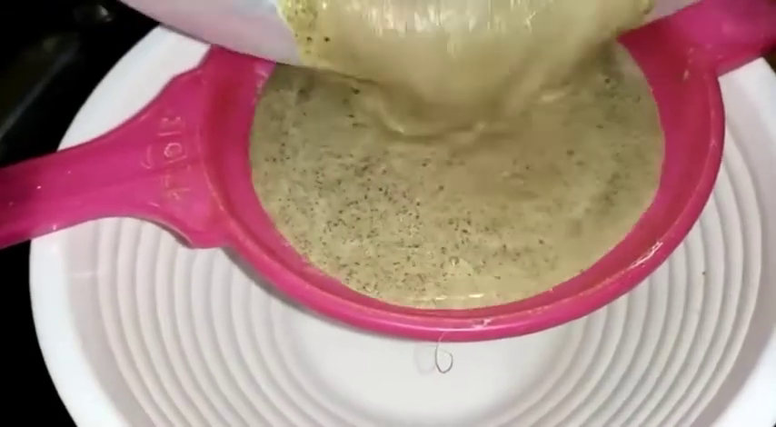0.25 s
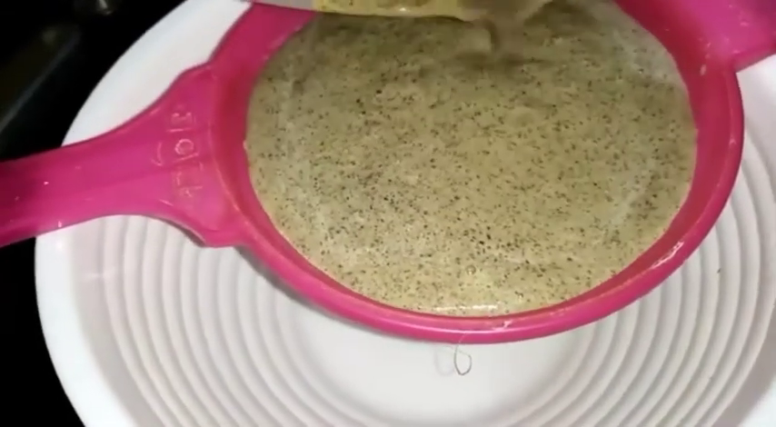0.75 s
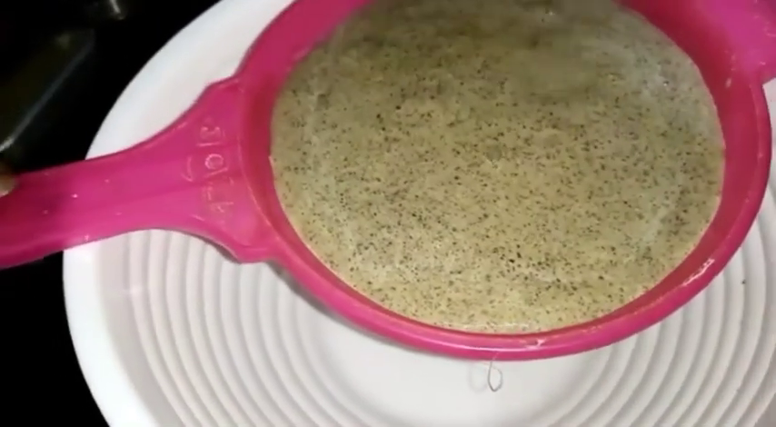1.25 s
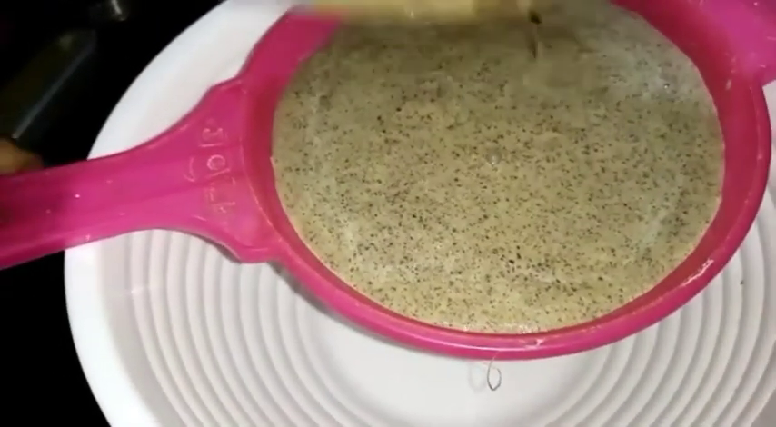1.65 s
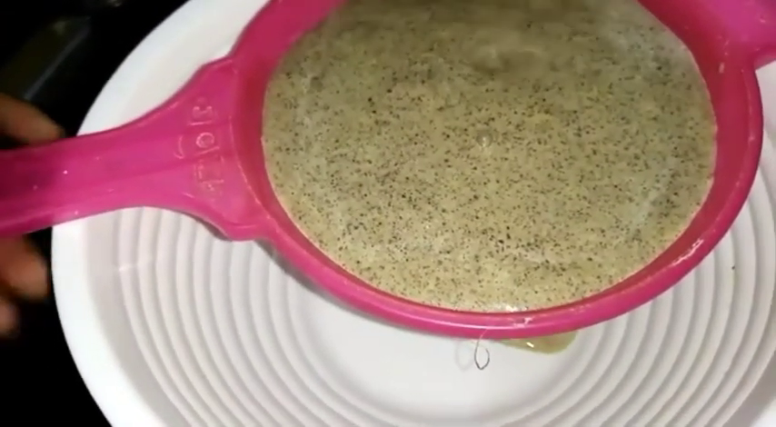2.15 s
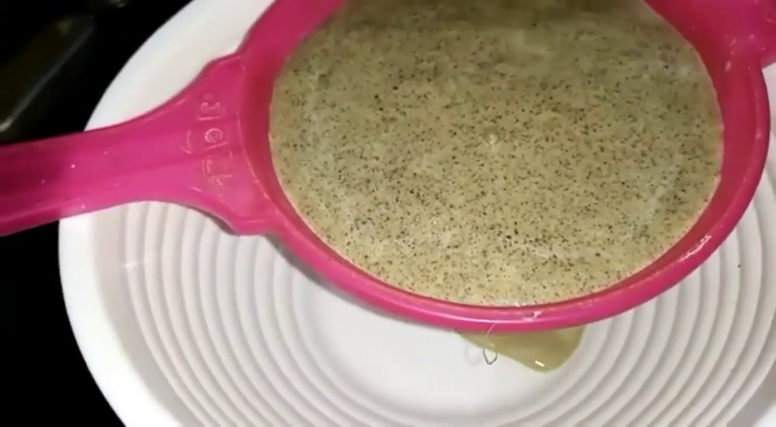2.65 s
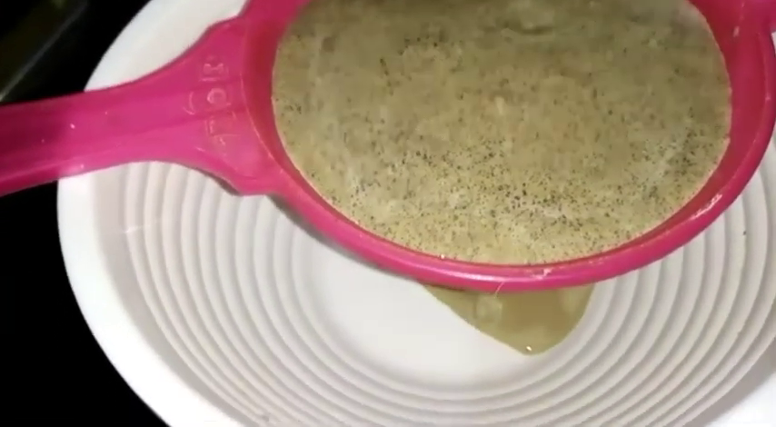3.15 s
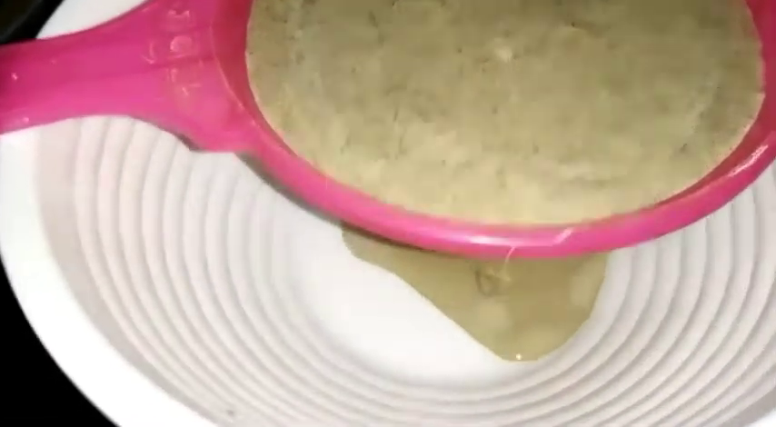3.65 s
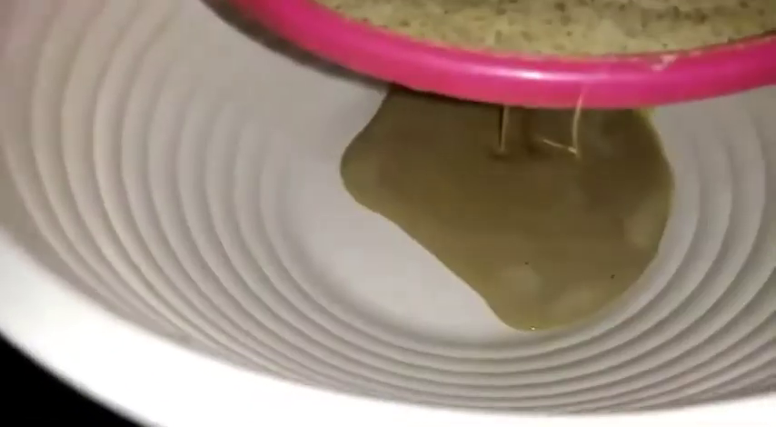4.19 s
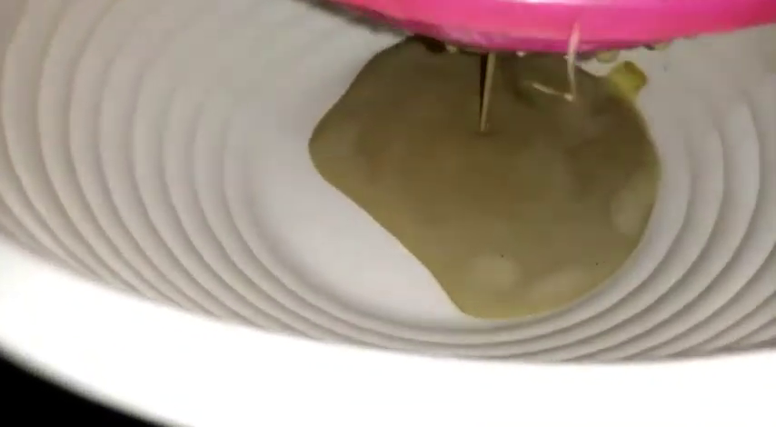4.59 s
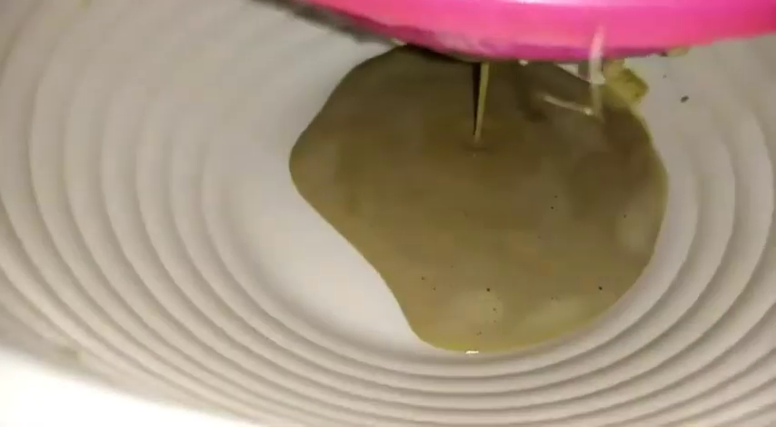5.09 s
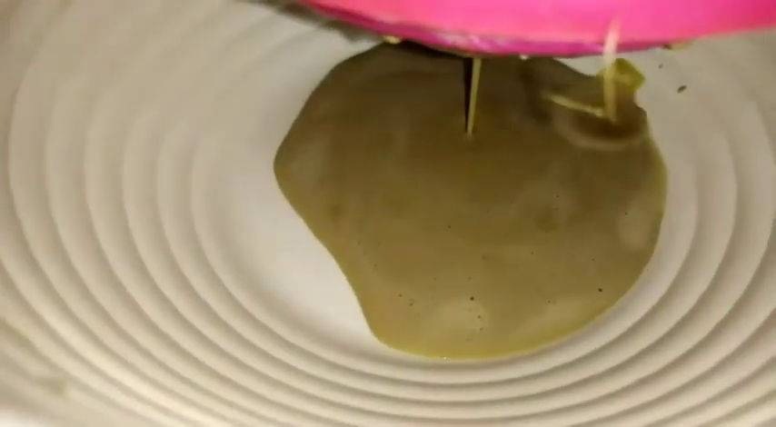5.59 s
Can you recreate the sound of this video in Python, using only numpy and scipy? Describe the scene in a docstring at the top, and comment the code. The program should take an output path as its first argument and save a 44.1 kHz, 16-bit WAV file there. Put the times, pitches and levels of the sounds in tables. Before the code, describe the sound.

A hard-walled kitchen with steady low mains hum near 100 Hz, soft hiss, patchy room noise and faint rustle. From 0.15 to 0.4 s thick liquid drops close by into a plastic strainer: several quick wet splats with hollow ringing glugs around 550 Hz, strongest at 0.25 s, plus a brief wet rush that dies away. Afterwards the liquid is practically silent. A small cage bird further off chatters throughout, mostly heard as reflections: short grainy rasps near 5.5 kHz, hoarse fluttering slurs around 3 kHz and scooping whistles, busiest and loudest at 2.6-2.9 and 3.4-3.8 s, then mainly rasps from 4.5 s. A faint thin fizz passes at about 5.1 s. Hard kitchenware knocks crack and ring at 5.56 s, with weaker taps and a short pot tone near 820 Hz, then another strong knock at 5.82 s. The left channel is nearer, louder and duller; the right thinner.

```python
"""Thick liquid glugs from a pot into a plastic strainer, each lump a splat and a ringing pocket of air,
with a wet noise rush that dies away; then it runs through all but silently.
All along, a small cage bird warbles and chatters further off in the hard-walled room, in fluttering tones
and grainy noise, over mains hum, hiss, room noise and a faint rustle. A thin fizz comes late, then
kitchenware knocks: noise cracks and damped modes. Of two microphone ports the left is nearer, louder, duller."""
import sys
import numpy as np
from scipy import signal
from scipy.fft import rfft, irfft, next_fast_len
from scipy.io import wavfile
from scipy.ndimage import uniform_filter1d, map_coordinates

SR = 44100
rng = np.random.default_rng(int(sys.argv[2]) if len(sys.argv) > 2 else 0)


def unload_wav(signal):
    """Save mono or channel-first audio to the path in sys.argv[1] as 16-bit WAV at rate SR, clipped to [-1, 1]."""
    wavfile.write(
        sys.argv[1],
        SR,
        np.round(np.clip(np.atleast_2d(signal).T, -1, 1) * 32767).astype(np.int16),
    )


N = 257103
RUN_UP_S = .02  # room for the soft start of one of the bird's notes


def amp(db):
    """Decibels to gain."""
    return 10 ** (np.asarray(db) / 20)


def unit(x):
    """Scale to rms 1."""
    return x / np.sqrt(np.mean(x ** 2) + 1e-20)


def along(points, hz):
    """Read (frequency, value) points at hz, on a log frequency axis."""
    f, v = np.transpose(points)
    return np.interp(np.log(hz + 1e-3), np.log(f), v)


def level(curve):
    """(time [s], level [dB]) rows as one gain per sample."""
    return amp(np.interp(np.arange(N) / SR, *np.transpose(curve)))


def wobble(rate, size):
    """A smooth random curve, rate knots a second."""
    knots = rng.standard_normal(int(size * rate / SR) + 4)
    return map_coordinates(knots, [np.arange(size) * rate / SR])


def filtered(x, response):
    """x shaped by a complex response of frequency."""
    size = x.shape[-1]
    m = next_fast_len(size + 8192)
    return irfft(rfft(x, m) * response(np.fft.rfftfreq(m, 1 / SR)), m)[..., :size]


def noise(colour, size, centre=1):
    """Noise of rms 1 with the given colour, its frequencies multiplied by centre."""
    return unit(filtered(rng.standard_normal(size), lambda hz: amp(along(colour, hz / centre))))


def add(track, s, sound):
    """Mix a sound into the track at time s."""
    start = round(s * SR)
    part = sound[..., :max(N - start, 0)]
    track[..., start:start + part.shape[-1]] += part


def ring(modes, t, scatter_db, pitch=1, damping=1):
    """Damped modes, struck at slightly new strengths; neighbouring modes swing opposite ways."""
    total = 0
    for k, (hz, db, t60) in enumerate(modes):
        mode_db = db + scatter_db * rng.standard_normal() - 60 * damping * t / t60
        total = total + (-1) ** k * amp(mode_db) * np.sin(2 * np.pi * hz * pitch * t)
    return total


def in_room(x, direct_db, wet_db):
    """The direct sound plus the walls' answer: decaying noise, different at each port."""
    # decay of the walls' answer: (frequency [Hz], t60 [s])
    wall_t60 = [(200, 0.32), (1000, 0.36), (3000, 0.53), (5000, 0.51), (8000, 0.45), (14000, 0.27)]
    hz, t, z = signal.stft(rng.standard_normal((2, SR // 2)), SR, nperseg=256)
    decay = amp(-60 * t / along(wall_t60, hz)[:, None])
    tail = signal.istft(z * decay, SR, nperseg=256)[1]
    tail *= np.clip(np.arange(tail.shape[1]) / SR / 0.00092, 0, 1)  # fades in over 0.92 ms
    response = amp(wet_db) * tail / np.linalg.norm(tail[0])
    response[:, 0] += amp(direct_db)
    return signal.fftconvolve(x[None], response, axes=1)


def pour():
    """The stream rushes wetly; each lump splats and traps a ringing pocket of air."""
    # lumps falling into the strainer: (time [s], level [dB], splat relative to it [dB])
    glugs = [(.151, -22.5, -8), (0.1904, -27, -16), (0.2024, -41.5, 11.5), (.231, -32, -3),
             (.246, -11, -10), (0.2853, -23, -8.5), (.367, -32.5, -5)]
    # modes of the air pocket under a full lump: (frequency [Hz], level [dB], t60 [s])
    pocket_modes = [(550, 2.5, 0.057), (729, -4.5, 0.058), (883, -21.5, .08), (1145, -27, 0.087),
                    (1490, -22, 0.091)]
    # colour of splat and rush: (frequency [Hz], level [dB])
    splat_colour = [(200, -20), (420, -13.5), (600, -8.5), (1200, -8), (2200, -6.5), (4000, -7.5),
                    (6500, -14), (9000, -19.5), (12000, -51), (15000, -22)]
    # wet rush of the stream: (time [s], level [dB])
    rush_level = [(0, -40.5), (.12, -50), (.28, -41), (.36, -85), (.5, -132), (.9, -84)]
    # a smaller lump traps less air and rings higher and shorter: share of rise per dB below a full lump
    full_lump_db, pitch_rise, damping_rise = -11, .004, .03
    # the small pocket radiates next to nothing below 510 Hz
    pocket_highpass = signal.butter(8, 510, "high", fs=SR, output="sos")

    out, t = np.zeros((2, N)), np.arange(SR // 4) / SR
    for s, db, splat_db in glugs:
        smaller_db = full_lump_db - db
        pitch, damping = 1 + pitch_rise * smaller_db, 1 + damping_rise * smaller_db
        pocket = ring(pocket_modes, t, scatter_db=1, pitch=pitch, damping=damping)
        # the pocket closes just after the splat, so its ring starts softly
        pocket *= (1 - np.exp(-t / 0.0008)) ** 2
        pocket = signal.sosfilt(pocket_highpass, pocket)
        splat = noise(splat_colour, len(t)) * amp(splat_db - 60 * t / 0.018)  # t60 18 ms
        add(out, s, in_room(amp(db) * (pocket + splat), direct_db=0.5, wet_db=-13.5))
    uneven = unit(noise(splat_colour, N) * amp(2.6 * wobble(303, N)))
    add(out, 0, in_room(level(rush_level) * uneven, direct_db=-1, wet_db=-1.5))
    return out * amp([[1], [-2]])  # the pour leans left


def bird():
    """A warble of scooping whistles, hoarse slurs and rasps, heard mostly off the walls."""
    # clear whistles, most scooping up: (time [s], length [s], pitch [Hz], level [dB], share it starts flat)
    whistles = [(1.535, 0.06, 4930, -40, 0.07), (1.836, 0.023, 5300, -42.5, 0),
                (2.145, 0.081, 4990, -40.5, 0.071), (2.208, 0.028, 3605, -46, 0),
                (2.24, 0.07, 2884, -39.5, 0.047), (2.94, 0.043, 4390, -32.5, 0.045),
                (2.942, 0.031, 3950, -39.5, 0.024), (3.186, 0.077, 5087, -40.5, .07),
                (3.346, 0.022, 2780, -39.5, 0.00022), (3.439, .02, 4070, -40.5, 0),
                (3.457, 0.028, 3920, -38, 0.065), (3.475, 0.047, 4650, -34, 0.049),
                (3.49, 0.037, 5180, -31, 0.043), (3.739, 0.014, 2933, -32, 0.012),
                (3.785, 0.085, 4723, -35, 0.013), (3.79, 0.072, 6370, -48.5, 0.025),
                (4.108, 0.024, 3715, -32.5, 0.025), (4.612, 0.021, 7440, -44, 0.063)]
    # hoarse slurs, mostly falling, often two at once:
    # (time [s], length [s], first pitch [Hz], last pitch [Hz], flutter [Hz], level [dB])
    slurs = [(0.422, 0.05, 3200, 3000, 232, -48), (0.652, 0.036, 3180, 3030, 280, -47),
             (0.779, 0.045, 3134, 3310, 400, -40.5), (0.845, .09, 2865, 2570, 203, -46),
             (1.326, 0.0584, 3780, 3620, 180, -45), (1.366, 0.086, 3003, 2630, 284, -44.5),
             (1.465, 0.056, 2440, 2286, 120, -52), (1.794, 0.17, 3547, 3220, 432, -42.5),
             (2.037, 0.056, 3080, 2764, 172, -43.5), (2.218, 0.045, 3530, 3300, 350, -44),
             (2.58, 0.057, 4280, 3744, 135, -30.5), (2.648, 0.047, 3970, 4090, 110, -34.5),
             (2.636, .09, 3207, 2965, 189, -34.5), (2.7, 0.085, 5100, 4710, 280, -42.5),
             (2.707, .1, 1890, 1958, 258, -46), (2.716, 0.074, 3690, 3610, 140, -37.5),
             (2.745, 0.094, 2993, 2845, 99, -35), (2.819, .055, 3780, 3830, 200, -41),
             (3.116, 0.11, 2663, 2356, 154, -48.5), (3.213, 0.099, 3726, 3050, 352, -37.5),
             (3.55, 0.091, 4577, 4320, 284, -35.5), (3.751, 0.15, 3354, 3125, 280, -41),
             (3.744, 0.16, 3950, 4303, 230, -34.5), (4.069, 0.053, 3027, 2966, 150, -39.5),
             (4.16, 0.12, 3310, 2897, 420, -43), (4.171, .04, 2616, 2376, 160, -41),
             (4.267, 0.05, 4600, 4920, 330, -38.5), (4.431, 0.03, 4100, 3990, 346, -42.5),
             (4.763, 0.16, 3300, 3424, 300, -46), (5.172, 0.038, 3597, 3500, 192, -35),
             (5.39, 0.037, 5070, 4910, 258, -40.5)]
    # bursts of rasping chatter: (time [s], length [s], level [dB], centre [Hz])
    rasps = [(0.048, 0.063, -34, 5950), (0.858, 0.049, -32, 5390), (0.986, 0.053, -34.5, 5670),
             (1.133, 0.064, -33, 5640), (1.246, 0.02, -42.5, 5670), (1.351, 0.062, -38.5, 5700),
             (1.609, 0.082, -33, 5950), (1.833, 0.059, -43, 4870), (2.805, 0.058, -30.5, 5670),
             (3.634, 0.072, -37.5, 5600), (4.238, 0.084, -52, 5670), (4.495, 0.112, -46.5, 5470),
             (4.692, 0.068, -39, 5500), (4.77, 0.111, -36, 5730), (4.898, 0.074, -33.5, 5650),
             (5.066, 0.06, -39.5, 5660), (5.121, 0.11, -36.5, 5850), (5.394, .1, -37.5, 5480),
             (5.637, 0.066, -38, 5600)]
    scoop_s = 0.0301  # time constant of the scoop
    # a whistle louder than the easy level flutters more
    easy_db, easy_flutter_hz, strain_hz_per_db = -42.5, 72, 8
    slur_rasp_db, slur_rasp_hz = -9, 4940  # every slur carries some rasp: its relative level and centre

    out, t = np.zeros((2, N)), note_time()
    for s, length, hz, db, flat in whistles:
        scoop = 1 - flat * np.exp(-np.maximum(t, 0) / scoop_s)
        flutter_hz = easy_flutter_hz + strain_hz_per_db * max(db - easy_db, 0)
        add(out, s - RUN_UP_S, amp(db) * tone(hz * scoop, flutter_hz, length))
    for s, length, first_hz, last_hz, flutter_hz, db in slurs:
        pitch_hz = np.interp(t, [0, length], [first_hz, last_hz])
        slur = tone(pitch_hz, flutter_hz, length)
        hoarse = slur + amp(slur_rasp_db) * rasp(slur_rasp_hz, length)
        add(out, s - RUN_UP_S, amp(db) * hoarse)
    for s, length, db, centre_hz in rasps:
        add(out, s - RUN_UP_S, amp(db) * rasp(centre_hz, length))
    return out


def note_time():
    """Time within one of the bird's notes (s), negative in its run-up."""
    return np.arange(SR // 3) / SR - RUN_UP_S


def swell(t, length, rise, fall):
    """Envelope of a note: a soft start, a hold and a soft end."""
    opening = np.clip(t / rise + .5, 0, 1)
    closing = np.clip((length - t) / fall + 1, 0, 1)
    return np.sin(np.pi / 2 * opening * closing) ** 2


def tone(pitch_hz, flutter_hz, length):
    """One sung note in the room; fast flutter makes it hoarse, a slower quaver breaks it into strands."""
    t = note_time()
    quaver = .9 * wobble(1300, len(t)) + .3 * wobble(120, len(t))
    phase = 2 * np.pi * np.cumsum(pitch_hz + flutter_hz * quaver) / SR
    wave = np.sin(phase) + amp(-32.5) * np.sin(2 * phase)  # with a faint octave overtone
    note = unit(wave * amp(2 * wobble(160, len(t))))
    return in_room(note * swell(t - .007, length, rise=0.041, fall=0.0039), direct_db=-3.5, wet_db=2.0)


def rasp(centre_hz, length):
    """One burst of grainy rasp in the room: coloured noise of rapidly uneven level."""
    # colour of a rasp: (frequency [multiple of its centre], level [dB])
    rasp_colour = [(.1, -10), (.24, -22), (.36, -13), (.46, -8), (.56, -3), (.67, -5.5), (.88, 1),
                   (1.12, 0.5), (1.3, -11), (1.6, -25), (2.1, -36), (2.6, -26.5)]
    t = note_time()
    grain = amp(4.05 * wobble(256.0, len(t)))
    burst = unit(grain * noise(rasp_colour, len(t), centre_hz))
    return in_room(burst * swell(t - .008, length, rise=0.025, fall=0.0088), direct_db=-6.0, wet_db=1.0)


def knocks():
    """A knock is a noise crack and ringing modes, each blow with its own contact time; a jolted pot sings along."""
    # blows: (time [s], level [dB], crack relative to it [dB], contact time [s])
    blows = [(5.5622, -24, 9, 0.00069), (5.5655, -30, 8, .0005), (5.5985, -38, 5, .0005),
             (5.675, -38, 13, 0.0011), (5.692, -42, 5, 0.0023), (5.765, -47, 8, .003),
             (5.8217, -22.5, 10.5, 0.0005)]
    # modes of the kitchenware: (frequency [Hz], relative level [dB], t60 [s])
    ware_modes = [(363, -8.5, 0.1), (442, 3, 0.14), (1140, -21, .17), (1476, -2, .13), (2342, -10, 0.26),
                  (2853, -2, 0.33), (2955, -5, .3), (3300, -5, .1), (3680, -16, .1), (4130, -1, 0.12),
                  (4410, 0, 0.049)]
    # colour of the crack: (frequency [Hz], level [dB])
    crack_colour = [(40, -47), (150, -2), (500, -10.5), (900, -7.5), (1400, -18), (1950, -5), (2800, -3),
                    (3400, 2), (4400, -2), (5100, -10), (6200, -21), (7400, -11), (9000, -31), (15000, -31)]
    # jolts that set the pot singing: (time [s], level [dB])
    pot_jolts = [(5.563, -43), (5.585, -33.5), (5.697, -38)]
    # modes of the pot: (frequency [Hz], level [dB], t60 [s])
    pot_modes = [(822, 0, .3), (850, -19, .16)]
    crack_t60_s = 0.041

    out, t = np.zeros((2, N)), np.arange(SR // 2) / SR
    for s, db, crack_db, contact_s in blows:
        blow = amp(db) * (1 - np.exp(-t / contact_s))  # a longer contact starts more slowly
        crack = noise(crack_colour, len(t)) * amp(crack_db - 60 * t / crack_t60_s)
        body = .5 * ring(ware_modes, t, scatter_db=1.5)
        add(out, s, in_room(blow * crack, direct_db=-0.5, wet_db=-1.5))
        add(out, s, in_room(blow * body, direct_db=0.5, wet_db=-3.5))
    for s, db in pot_jolts:
        song = ring(pot_modes, t, scatter_db=1) * (1 - np.exp(-t / .002))
        song *= amp(2 * wobble(90, len(t)))
        add(out, s, in_room(amp(db) * song, direct_db=2.5, wet_db=-8.5))
    return out


def rustle():
    """A faint, uneven rustle and a brief thin fizz: coloured noise, unrelated at the two ports."""
    # rustle in the middle range: (time [s], level [dB])
    rustle_level = [(0, -47.5), (.6, -61.5), (1.1, -56.5), (2.7, -56.5), (3.1, -56), (3.41, -46.5),
                    (3.55, -52), (4.2, -50.5), (4.9, -54.5), (5.1, -47), (5.3, -53.5), (5.83, -49)]
    # its colour: (frequency [Hz], level [dB])
    rustle_colour = [(250, -20), (500, 3), (720, -5), (820, 5.5), (950, -5), (1250, 0.5), (1550, -2.5),
                     (1850, -0.5), (2600, -16), (4000, -22.5)]
    # fizz: (time [s], level [dB])
    fizz_level = [(5, -110), (5.08, -43), (5.17, -49), (5.26, -73), (5.4, -110)]
    # its colour: (frequency [Hz], level [dB])
    fizz_colour = [(5000, -28), (8500, -8), (10500, -17), (12500, -4), (15000, -12)]
    soft = np.array([noise(rustle_colour, N) for port in range(2)])
    fizz = np.array([unit(noise(fizz_colour, N) * amp(2.5 * wobble(200, N))) for port in range(2)])
    return level(rustle_level) * soft + level(fizz_level) * fizz


def air():
    """Soft room noise, alike at the two ports only in the low range, by mixing a shared and a side noise."""
    # colour of the room noise: (frequency [Hz], level [dB])
    air_colour = [(20, -35), (40, -22), (70, -14.5), (135, -7.5), (230, -17.5), (350, -13.5), (450, -15.5),
                  (620, -16), (900, -23), (1000, -18.5), (1200, -35.5), (1600, -22), (2200, -22.5),
                  (3200, -20.5), (6400, -24.5), (8000, -31.5), (11000, -55)]
    # likeness of left and right: (frequency [Hz], correlation [-1 to 1])
    likeness = [(60, 0.2), (300, 1), (600, 0.8), (1200, 0.055), (4000, 0.014)]

    def turn(hz):
        return np.arccos(np.clip(along(likeness, hz), -1, 1)) / 2

    mid = filtered(noise(air_colour, N), lambda hz: np.cos(turn(hz)))
    side = filtered(noise(air_colour, N), lambda hz: np.sin(turn(hz)))
    return amp(-45.0 + 0.7 * wobble(4.03, N)) * np.array([mid + side, mid - side])


def patchy(x):
    """Give noise drifting patches of gain in time and frequency, the same at both ports."""
    # how far the noise comes and goes, most in the middle range: (frequency [Hz], depth [dB])
    patch_depth = [(150, 1), (500, 3), (1000, 5), (1800, 5), (3000, 2.5), (8000, 2)]
    hz, t, z = signal.stft(x, SR, nperseg=1024)
    field = uniform_filter1d(rng.standard_normal(z.shape[1:]), size=3, axis=0)  # smooth over frequency
    field = uniform_filter1d(field, size=8, axis=1)  # smooth over time
    gain = amp(along(patch_depth, hz)[:, None] * np.minimum(unit(field), 1))
    gain /= np.sqrt(np.mean(gain ** 2, axis=1, keepdims=True))  # keep each band's overall level
    return signal.istft(z * gain, nperseg=1024)[1][:, :N]


def background():
    """An appliance hums on the mains, in wavering sines, over the microphone's own hiss at each port."""
    # hum: (frequency [Hz], rms level ahead of the ports' colour [dB], waver [dB])
    hum_tones = [(99.8, -45.5, -0.3), (126.8, -64.5, 3), (189.5, -65, 3), (298.8, -53, 1.83)]
    t = np.arange(N) / SR
    hum = 0
    for hz, db, waver_db in hum_tones:
        gain = np.sqrt(2) * amp(db + waver_db * wobble(18, N))
        hum = hum + gain * np.sin(2 * np.pi * hz * t + 0.08 * wobble(3.6, N))
    hiss = amp(-71) * rng.standard_normal((2, N))
    return hum + hiss


def scene():
    """Pour, bird and knocks over the patchy soft noise and the hum."""
    return pour() + bird() + knocks() + patchy(rustle() + air()) + background()


def record(dry):
    """Each port has its own colour and arrival time; nothing passes above the band limit."""
    # colour of the left port: (frequency [Hz], gain [dB])
    left_port = [(100, 2), (300, 6.5), (550, 5), (2500, 1.5), (4500, 2), (7000, 0), (7600, -10),
                 (8300, -24), (9500, -30), (11000, -4), (15000, -19)]
    # colour of the right port: (frequency [Hz], gain [dB])
    right_port = [(100, -5.5), (300, 0), (550, -5), (2500, -5.5), (4500, -10), (7000, -1.5), (9000, 1.5),
                  (15000, -17.5)]
    lead_s, top_hz = .00086, 15500  # sound reaches the left port first; band limit

    def ports(hz):
        half_lead = np.exp(1j * np.pi * hz * lead_s)  # left half a lead early, right half late
        left = amp(along(left_port, hz)) * half_lead
        right = amp(along(right_port, hz)) / half_lead
        return np.array([left, right]) * (hz < top_hz)

    return filtered(dry, ports)


dry = scene()
out = record(dry)
unload_wav(out)
```